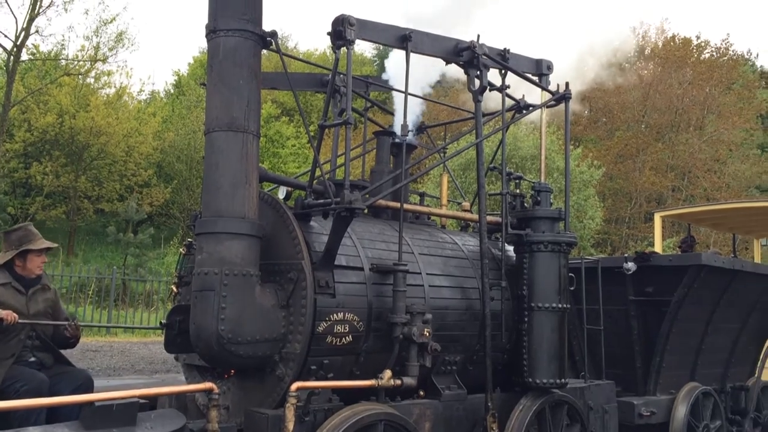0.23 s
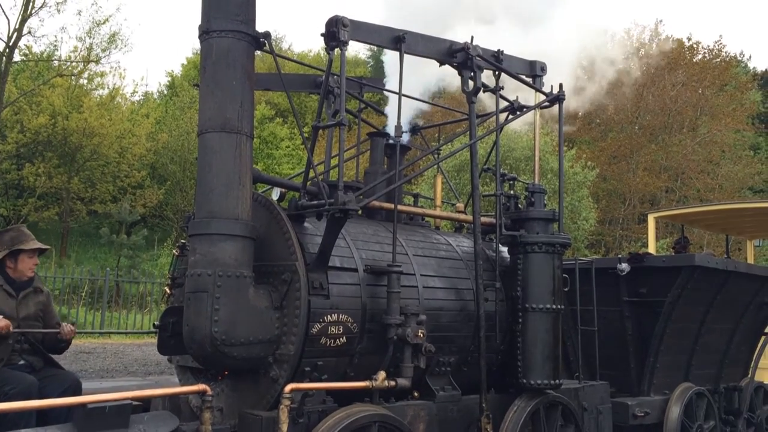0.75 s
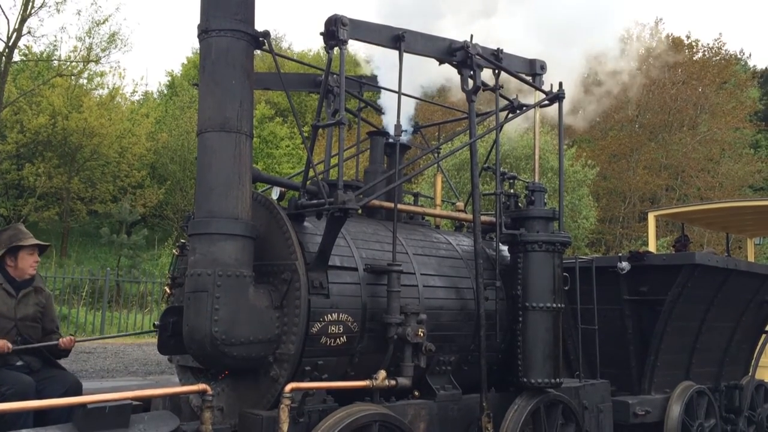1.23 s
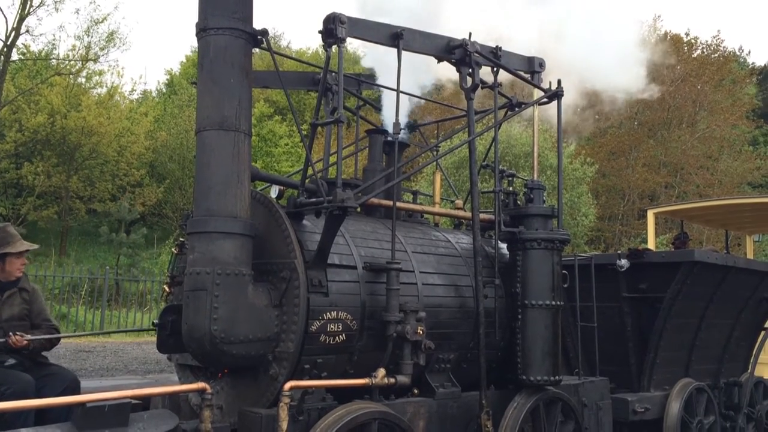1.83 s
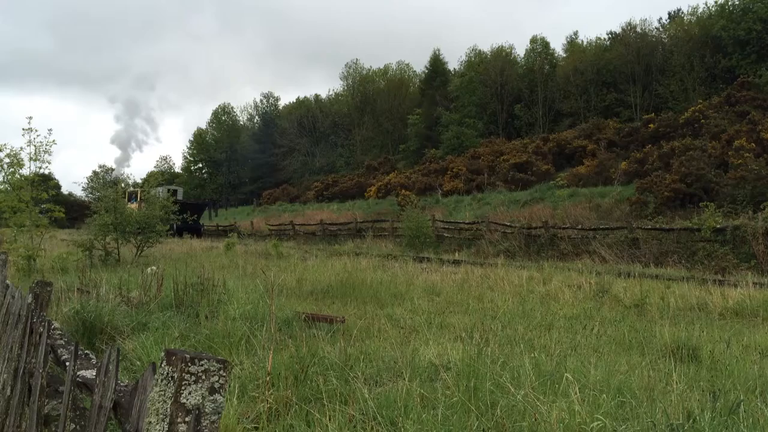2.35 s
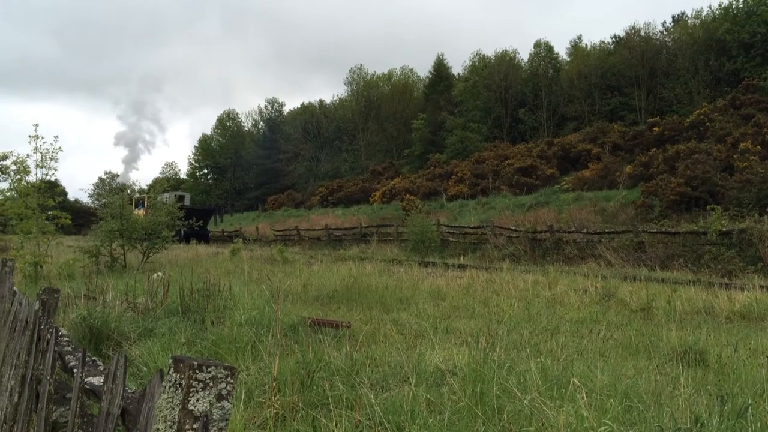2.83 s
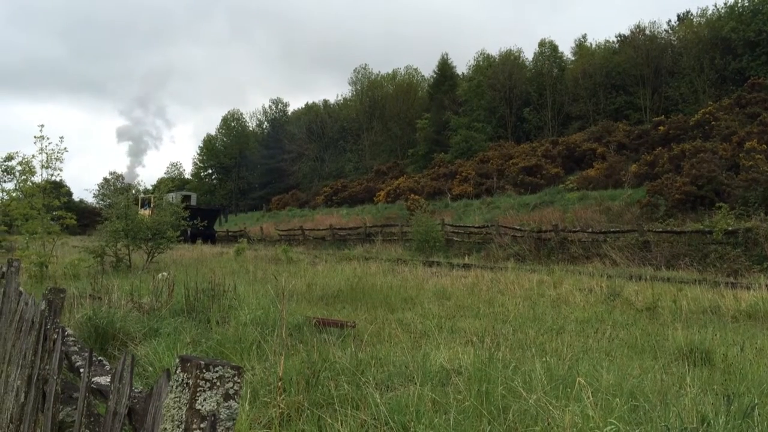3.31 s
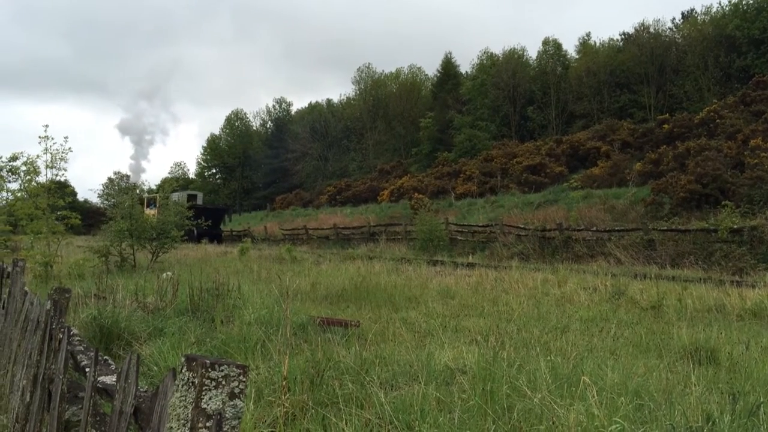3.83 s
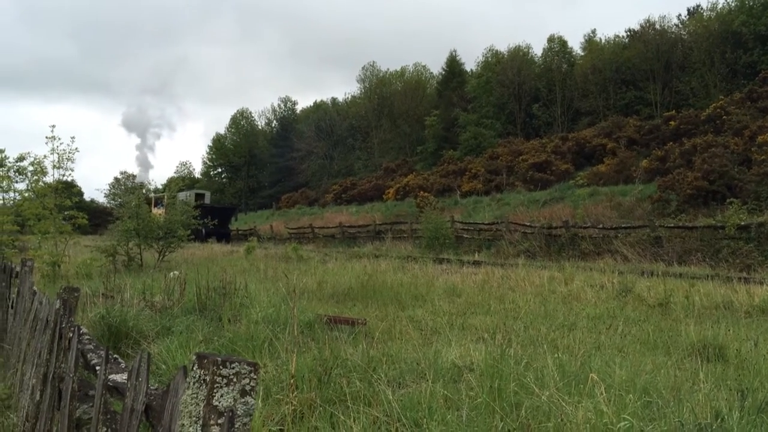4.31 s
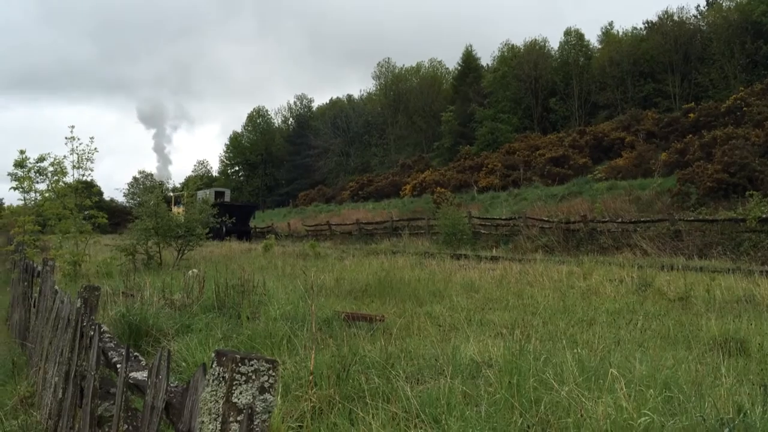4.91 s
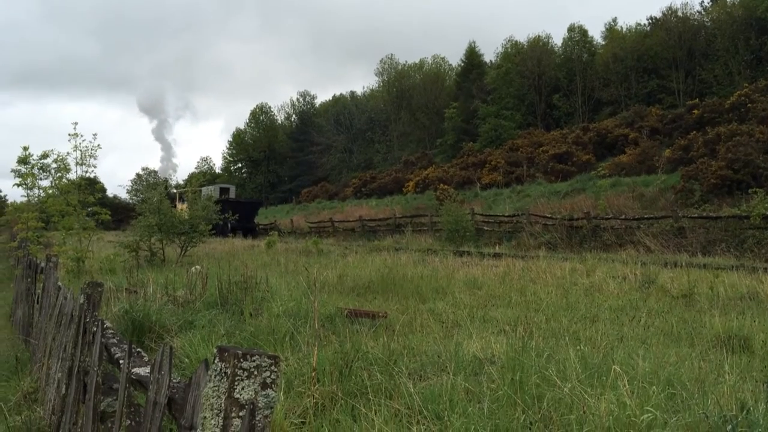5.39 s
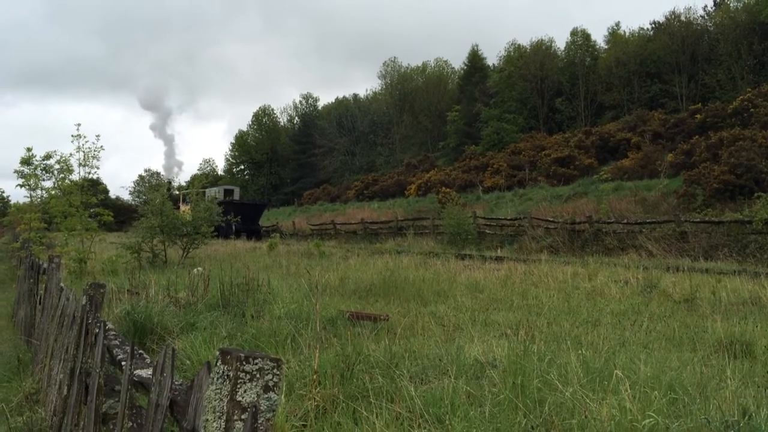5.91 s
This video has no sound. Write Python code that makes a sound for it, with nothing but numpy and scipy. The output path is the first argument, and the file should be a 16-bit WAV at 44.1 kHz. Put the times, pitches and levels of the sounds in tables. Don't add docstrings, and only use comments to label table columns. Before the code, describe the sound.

Loud close steam hisses and roars steadily with one metallic clank, then cuts through brief silence to a quiet meadow with birds and distant clanking.

```python
import sys
import numpy as np
from scipy import signal
from scipy.fft import rfft, irfft
from scipy.io import wavfile
from scipy.ndimage import uniform_filter1d

SR = 44100
rng = np.random.default_rng(int(sys.argv[2]) if len(sys.argv) > 2 else 0)


def invert_db(level):
    return 10 ** (np.asarray(level, dtype=float) / 20)


def master_out(mix):
    frames = np.transpose(np.atleast_2d(mix))
    ceiling = np.clip(frames, -1, 1)
    pcm = np.round(ceiling * 32767).astype(np.int16)
    wavfile.write(sys.argv[1], SR, pcm)


N = 271215

CUT_S, MEADOW_S = 2.4222, 2.5212

# time_s, level_db
JET_SWELL = [
    (0, -34.5),
    (1.2, -35.8),
    (2.1, -35),
    (2.4, -35.5),
]
# pitch_hz, level_db per Hz
JET_COLOUR = [(18, -67.5), (30, -41.5), (64, -8), (83, -13.5), (102, -24.5), (248, 2), (387, -7),
              (543, -8.5), (868, -4), (1040, -5), (2880, -12), (4490, -13.5), (15300, -13.5)]
# pitch_hz, width_hz, level_db (minus = a cancelled band)
JET_BANDS = [(270, 65, -4), (395, 35, -9), (546, 122, 8.5), (868, 51, -17), (1025, 140, 6), (1240, 68, 4),
             (1505, 32, 6), (1563, 72, -2.5), (1776, 44, 6), (1896, 73, -8.5), (1950, 120, 7),
             (2825, 820, -6), (4300, 320, 1)]
ROAR_DB, ROAR_FOLLOWS = -39.5, 0.45
# time_s, level_db
DRAUGHT = [
    (0, -79),
    (.3, -60.5),
    (.7, -64.5),
    (1.2, -60.5),
    (2.4, -69),
]
# time_s, rise_db, spread_s
GULPS = [
    (.76, 20.5, 0.059),
    (1.5, 8, 0.13),
]
UPPER_DB, LOW_FOLLOWS = -4, 0.37
# pitch_hz, level_db, t60_s
TOOL_MODES = [(242, -15, .4), (2013, -8, .2), (2805, -18, .3), (2450, -19, .08), (4400, -19, .08),
              (6250, -19, .08), (3015, -21, .2), (3300, -13, .05), (3542, -14, .2), (3736, -12, .15),
              (3994, -20, .15), (4775, -17, .2), (5044, -15, .09), (5330, -12, .05), (5626, -15, .18),
              (5911, -18, .12), (6800, -16, .05), (7370, -20, .12)]
# pitch_hz, level_db, t60_s
PLATE_MODES = [(460, -17, .08), (625, -8, .1), (780, -9, .1), (1050, -5, .08), (1205, -4, .07),
               (1270, -3, .07), (1540, -2, .05), (1707, -4, .045)]
# time_s, level_db
CONTACTS = [
    (1.5963, -30),
    (1.6015, -27),
    (1.6068, -23),
    (1.6112, -28),
]

# start_s, length_s, pitch_hz, level_db
HELD = [(2.52, 0.042, 1850, -71.5), (2.644, 0.058, 4980, -80), (3.52, 0.14, 2140, -72),
        (3.58, 0.019, 3080, -63), (3.6, .018, 3080, -62), (3.621, 0.034, 3010, -62.5),
        (3.075, 0.028, 2470, -68), (2.603, .032, 2400, -72), (3.679, .015, 3710, -68),
        (3.683, 0.014, 3210, -66), (3.701, .02, 3700, -70), (3.708, 0.032, 3080, -63.5),
        (3.717, .05, 2006, -73), (3.839, .045, 2790, -73), (5.04, 0.19, 7350, -85), (4.09, .1, 3050, -69),
        (4.05, .03, 4500, -78), (3.41, .012, 4900, -77), (5.58, .08, 2200, -81), (5.97, .08, 2620, -79),
        (4.315, .01, 5150, -64.5), (4.506, .025, 2250, -77), (4.561, 0.1, 2020, -75),
        (4.607, 0.022, 3220, -65), (4.847, .08, 7680, -84), (4.87, .11, 7200, -86),
        (5.163, 0.063, 2410, -80), (5.241, .03, 5500, -76), (5.31, .07, 1870, -79.5),
        (5.36, .015, 5800, -83), (5.67, 0.14, 2000, -79), (5.775, .008, 4700, -72),
        (5.788, .008, 4900, -72), (5.795, .02, 5250, -77), (5.838, 0.15, 2625, -69.5),
        (5.886, .022, 1520, -74), (5.92, .025, 1520, -71), (5.95, .03, 1500, -77), (5.882, .015, 2000, -73),
        (5.78, .015, 1950, -73)]
SAG = .012
# start_s, length_s, first_hz, last_hz, level_db
SLIDES = [(3.798, .015, 3200, 4200, -69.5), (3.812, .028, 4300, 2850, -67), (4.249, .008, 3600, 5500, -67),
          (4.257, .033, 4600, 3900, -68.5), (3.604, 0.034, 4850, 3730, -68), (4.313, .006, 5800, 5100, -70),
          (3.225, .035, 3640, 4300, -71), (3.31, .02, 4150, 3600, -69), (3.505, 0.0296, 1650, 1200, -74),
          (3.536, .014, 3300, 2300, -69), (3.14, 0.011, 2600, 1950, -68), (3.47, 0.035, 2610, 1660, -60),
          (3.586, .01, 3600, 5330, -65.5), (3.923, 0.014, 3400, 7900, -74), (3.94, .045, 1200, 1400, -74),
          (3.955, .026, 2780, 2550, -62.5), (3.981, .02, 2550, 2100, -73), (3.972, .013, 8000, 4600, -70),
          (4.007, .025, 1740, 1610, -72), (4.01, 0.03, 2930, 2600, -73), (4.138, 0.034, 3000, 3360, -66.5),
          (5.06, .015, 5400, 7200, -72), (5.043, .018, 3200, 4300, -75), (5.205, .013, 5800, 7000, -79),
          (5.218, .024, 7000, 5200, -74), (5.4, 0.11, 2200, 2150, -82), (5.8, .04, 2950, 3300, -79),
          (5.656, 0.049, 6250, 4400, -70.5)]
# start_s, length_s, foot_hz, top_hz, level_db
ARCHES = [
    (2.642, 0.061, 2580, 2934, -61),
    (2.83, .03, 3600, 3770, -84),
    (3.097, 0.049, 2500, 2980, -54.5),
    (3.285, .035, 3050, 3390, -72),
    (3.428, .03, 3600, 3950, -67),
    (3.262, .025, 4700, 5000, -78),
    (4.562, .035, 3930, 4450, -72),
    (5.31, .04, 5300, 6000, -75.5),
]
# start_s, length_s, first_hz, last_hz, level_db
HOOKS = [(2.57, 0.036, 2050, 2460, -71), (2.714, .068, 2200, 2450, -75), (2.6, 0.047, 5600, 5020, -77),
         (2.765, 0.022, 2090, 1880, -70), (2.785, .02, 4700, 5500, -82), (2.822, .135, 2410, 2150, -72),
         (3.068, .024, 5900, 4600, -74), (3.465, 0.024, 1600, 1210, -69.5), (2.803, .03, 8820, 6900, -80),
         (3.97, .06, 4100, 3350, -79), (4.074, .008, 5400, 5050, -64), (4.045, .13, 2180, 2330, -67),
         (4.235, .014, 4850, 4600, -72), (4.255, 0.032, 5450, 6120, -72), (4.355, 0.039, 3500, 6200, -74),
         (4.366, 0.032, 4700, 4250, -69.5), (4.53, 0.022, 3760, 4000, -67), (4.641, .045, 3250, 4500, -68),
         (4.825, 0.083, 6640, 3600, -68), (5.338, 0.015, 5470, 5420, -70), (5.385, .035, 7200, 6800, -79),
         (5.472, .015, 7000, 5000, -81), (5.56, .02, 5930, 5370, -75), (5.81, .03, 6900, 6070, -81),
         (5.92, 0.034, 6300, 5200, -70.5)]
HOOK_POWER = 2.6
# start_s, length_s, first_hz, last_hz, level_db
SCOOPS = [(2.985, .03, 4550, 3700, -75), (2.96, .06, 2150, 2350, -80), (5.945, .008, 5250, 4800, -76),
          (3.389, .025, 4600, 3650, -74), (3.437, .03, 5100, 4350, -73), (6.068, .045, 5500, 4500, -71.5),
          (4.17, .1, 2330, 1980, -74), (4.17, .12, 3100, 2600, -75), (4.2, .11, 2600, 2250, -75),
          (2.595, .03, 1780, 1600, -74), (3.03, .045, 2520, 2150, -70), (4.73, .06, 5000, 6800, -72),
          (4.975, .088, 5050, 5450, -66), (5.06, .062, 4400, 2700, -71.5), (4.7, .027, 5100, 3700, -78),
          (3.3, .03, 3150, 2600, -74), (3.655, .012, 2500, 2650, -72)]
SCOOP_POWER = 1.8
RAMP_S, THIN_DB = .005, 5
# start_s, length_s, middle_hz, width_hz, level_db
CHURRS = [(4.13, .18, 2250, 350, -70), (4.1, .22, 3050, 350, -70), (4.12, .18, 2650, 300, -72),
          (4.455, .085, 3000, 1400, -70), (4.345, .018, 5000, 1600, -71), (3.028, .04, 1740, 300, -72),
          (2.68, .12, 2000, 500, -76), (3.79, .05, 3500, 900, -74), (4.075, .035, 4700, 1200, -77),
          (4.33, .07, 5200, 1800, -76), (5.3, .3, 7200, 1600, -79), (5.79, .2, 6400, 2000, -80),
          (4.76, .07, 5250, 2000, -79), (4.85, .35, 3100, 1800, -77), (4.6, .2, 4300, 1500, -79),
          (5.05, .15, 4500, 2500, -79), (3.52, .04, 2100, 700, -69), (3.52, .06, 4400, 700, -75),
          (2.66, .13, 2650, 500, -73), (3.13, .1, 2500, 700, -71), (4.08, .18, 7720, 400, -84),
          (4.42, .26, 7680, 300, -83), (4.89, .09, 3680, 400, -77)]
CHURR_SAG_HZ = 91

# start_s, level_db, centre_hz, width_hz, length_s
TICKS = [(2.64, -75, 7930, 8900, .006), (3.099, -72, 7000, 9000, .008), (3.339, -62, 2500, 1600, .008),
         (3.341, -65, 8000, 9000, .0043), (3.516, -64, 11000, 6000, .004), (3.522, -67, 6000, 9000, .007),
         (3.528, -64, 5500, 9000, .02), (3.59, -76, 11000, 8000, .008), (4.076, -72, 7000, 9000, .008),
         (4.331, -72, 9000, 9000, .007), (4.885, -73, 3000, 2500, .012), (4.97, -72, 3300, 3500, .006),
         (5.178, -75, 4500, 2000, .006), (6.056, -60, 2400, 1500, .02), (6.057, -70, 9000, 9000, .008)]
# pitch_hz, level_db, t60_s
ROD_MODES = [(430, -5, .25), (595, 0, .16), (635, -5, .25), (740, -6, .1), (980, -1, .06), (1060, -3, .2),
             (1400, -12, .06), (1780, -13, .18), (1930, -8, .06), (2120, -3, .05), (2700, -7, .05),
             (2980, -8, .05)]
# start_s, level_db, brightness_db per octave
CLANKS = [(2.525, -63, -4), (2.58, -67, -2), (3.025, -66.5, 2), (3.944, -78, -13.5), (4.268, -68, 4),
          (4.281, -61, -4), (4.33, -68, -8), (4.422, -70, -10), (5.314, -85, 0), (5.797, -72, 3),
          (5.886, -67, 1), (5.985, -62.5, 2.5), (5.92, -75, 0), (6.056, -58.5, 5.5), (6.064, -60, 0),
          (6.088, -67.5, -12), (6.103, -65, 0), (6.123, -68, 3)]
# time_s, level_db
BUFFETS = [(2.53, -52), (3.0, -58.5), (3.03, -50.5), (3.46, -58.5), (3.9, -53.5), (4.44, -58), (4.47, -55),
           (5.5, -53), (5.63, -56), (5.66, -60.5), (5.91, -47.5), (5.97, -52), (6.04, -55), (6.11, -55),
           (6.15, -46)]
# pitch_hz, level_db per Hz
WIND_COLOUR = [(12, -29), (20, -7), (33, 8), (48, -2.5), (134, -3.5), (193, -6), (255, -42), (344, -28),
               (400, -28), (520, -54), (880, -120)]
# time_s, level_db
RUSH_SWELL = [
    (2.53, -66),
    (5.87, -66),
    (6.15, -60.5),
]
# pitch_hz, level_db per Hz
RUSH_COLOUR = [(120, -29), (200, -4), (272, -13.5), (470, -13.5), (617, -13.5), (856, -16), (1010, -15),
               (1420, -20), (3730, -22.5), (9090, -29.5), (14600, -31.5), (15400, -30.5)]
# time_s, low_hz, high_hz
SPLIT_BANDS = [(.15, 8300, 9650), (.15, 10350, 13800), (.195, 6200, 7600), (.195, 12400, 15300),
               (.29, 13100, 14500), (.45, 7600, 9000), (.45, 10350, 11700), (.545, 9000, 10350),
               (.71, 4150, 5200), (.755, 4150, 5700), (1.245, 4150, 5200), (1.245, 6200, 7600),
               (1.245, 11700, 13100), (1.385, 13100, 14500), (1.895, 4650, 7600), (2.08, 5200, 6200),
               (2.38, 5200, 6200), (5.4, 6200, 8300)]


def evened(x):
    return x / np.sqrt(np.mean(x ** 2) + 1e-20)


def read(points, hz):
    f, value = np.transpose(points)
    return np.interp(np.log(hz + 1), np.log(f + 1), value)


def curve(rows):
    rows = np.array(rows)
    return np.interp(np.arange(N) / SR, rows[:, 0], rows[:, 1])


def add(mix, start_s, sound):
    part = mix[round(start_s * SR):][:len(sound)]
    part += sound[:len(part)]


def hiss(colour_db, patchy_db, flicker_db, size):
    hz = np.fft.rfftfreq(size, 1 / SR)
    a, b, patches = rng.standard_normal((4 * N // size + 5, len(hz), 3)).T
    flicker = evened(uniform_filter1d(patches[0], size=3))
    patches = uniform_filter1d(patches, size=size // 80, axis=0)
    patches = evened(uniform_filter1d(patches, size=8000 // size + 4, axis=1))
    level_db = colour_db(hz)[:, None] + patchy_db * patches + flicker_db * flicker
    z = (a + 1j * b) * invert_db(level_db)
    return evened(signal.istft(z, nperseg=size, noverlap=3 * size // 4)[1][:N])


def hum(hz, width_hz):
    r = np.exp(-np.pi * width_hz / SR)
    slow = signal.lfilter([1], [1, -r], rng.standard_normal((N, 2)) @ [1, 1j])
    return evened((slow * np.exp(2j * np.pi * hz * np.arange(N) / SR)).real)


def ring(modes, tilt_db, crack_db, crack_s, crack_hz):
    t = np.arange(SR // 2) / SR
    tones = np.zeros(len(t))
    for hz, db, t60 in modes:
        level = invert_db(db + tilt_db * np.log2(hz / 1000) - 60 * t / t60)
        tones += level * np.sin(2 * np.pi * (hz * t + rng.random()))
    band = signal.butter(3, [400, crack_hz], "band", fs=SR, output="sos")
    grit = signal.sosfilt(band, rng.standard_normal(len(t)))
    return tones * np.minimum(t / 0.00074, 1) + invert_db(crack_db) * grit * np.exp(-t / crack_s)


def echoes(x, t60, first_s):
    t = np.arange(SR // 2) / SR
    signs = rng.choice([-1., 1.], len(t))
    sparse = rng.random(len(t)) < .06
    taps = signs * sparse * invert_db(-60 * t / t60) * (t > first_s)
    return signal.fftconvolve(x, taps / np.linalg.norm(taps))[:N]


def jet():
    def colour(hz):
        bands_db = sum(db / (1 + (2 * (hz - f) / width) ** 2) for f, width, db in JET_BANDS)
        return read(JET_COLOUR, hz) + bands_db
    whole = hiss(colour, patchy_db=0.66, flicker_db=0.24, size=2048)
    roar = signal.sosfiltfilt(signal.butter(3, 2600, fs=SR, output="sos"), whole)
    jet_db = curve(JET_SWELL)
    roar_db = ROAR_DB + ROAR_FOLLOWS * (jet_db - JET_SWELL[0][1])
    return invert_db(jet_db) * evened(whole - roar) + invert_db(roar_db) * evened(roar)


def firebox():
    t, draught_db = np.arange(N) / SR, curve(DRAUGHT)
    gulp_db = sum(rise_db * np.exp(-((t - s) / spread_s) ** 2) for s, rise_db, spread_s in GULPS)
    low = invert_db(draught_db + LOW_FOLLOWS * gulp_db) * hum(75, width_hz=5.2)
    upper = invert_db(draught_db + UPPER_DB + gulp_db) * hum(133, width_hz=25)
    return low + upper


def clank():
    out = np.zeros(N)
    tool = ring(TOOL_MODES, tilt_db=1.0, crack_db=0.5, crack_s=0.0066, crack_hz=7000)
    add(out, CONTACTS[0][0], invert_db(-21.0) * tool)
    for s, db in CONTACTS:
        plate = ring(PLATE_MODES, tilt_db=7.5, crack_db=10, crack_s=0.0062, crack_hz=2200)
        add(out, s, invert_db(db) * plate)
    return out + invert_db(-17) * echoes(out, t60=0.37, first_s=.004)


def whistles():
    out = np.zeros(N)
    shake = evened(uniform_filter1d(rng.standard_normal(N), size=150))
    held = [(s, length, hz * (1 + SAG), hz * (1 - SAG), db) for s, length, hz, db in HELD]
    kinds = [(held + list(SLIDES), lambda u: u),
             (ARCHES, lambda u: 4 * u * (1 - u)),
             (HOOKS, lambda u: 1 - (1 - u) ** HOOK_POWER),
             (SCOOPS, lambda u: u ** SCOOP_POWER)]
    for notes, bend in kinds:
        for start, length, from_hz, to_hz, db in notes:
            u = np.linspace(0, 1, round(length * SR))
            wobble = shake[round(start * SR):][:len(u)]
            pitch = (from_hz + (to_hz - from_hz) * bend(u)) * (1 + .006 * wobble)
            thinning_db = THIN_DB * np.log2(pitch / pitch.mean())
            level = invert_db(db + 3 + 1.7 * wobble[::-1] - thinning_db)
            shape = signal.windows.tukey(len(u), min(2 * RAMP_S / length, .6))
            add(out, start, shape * level * np.sin(2 * np.pi * np.cumsum(pitch) / SR))
    return out


def churrs():
    out = np.zeros(N)
    for start, length, hz, width, db in CHURRS:
        count = round(length * SR)
        rasp = evened(uniform_filter1d(rng.standard_normal(SR // 2), size=int(SR / width)))[:count]
        turns = np.cumsum(np.linspace(hz + CHURR_SAG_HZ, hz - CHURR_SAG_HZ, count)) / SR
        call = rasp * np.sin(2 * np.pi * turns) * signal.windows.tukey(count, .4)
        add(out, start, invert_db(db + 2.0) * call)
    return out


def birds():
    calls = whistles() + churrs()
    far_echo = invert_db(-7.5) * echoes(calls, t60=.85, first_s=.025)
    near_echo = invert_db(-10) * echoes(calls, t60=.2, first_s=.005)
    return calls + far_echo + near_echo


def grass():
    out = np.zeros(N)
    t, bins_hz = np.arange(2048) / SR, np.fft.rfftfreq(2048, 1 / SR)
    for s, db, hz, width, length in TICKS:
        band = np.exp(-.5 * ((bins_hz - hz) / (width / 2)) ** 2)
        grit = evened(irfft(rfft(rng.standard_normal(2048)) * band))
        add(out, s, invert_db(db) * grit * np.exp(-(t / length) ** 3))
    return out


def far_engine():
    out = np.zeros(N)
    for s, db, tilt_db in CLANKS:
        crack_hz = np.clip(1902 + 500 * tilt_db, 900, 5000)
        add(out, s, invert_db(db) * ring(ROD_MODES, tilt_db, crack_db=12, crack_s=0.01, crack_hz=crack_hz))
    return out + invert_db(-4) * echoes(out, t60=.28, first_s=.008)


def air():
    wind = hiss(lambda hz: read(WIND_COLOUR, hz), patchy_db=1.5, flicker_db=2.2, size=2048)
    rush = hiss(lambda hz: read(RUSH_COLOUR, hz), patchy_db=.7, flicker_db=.3, size=1024)
    bright = signal.sosfiltfilt(signal.butter(2, 2200, "high", fs=SR, output="sos"), rush)
    dull = invert_db(curve(RUSH_SWELL) + 2.0) * (rush - bright)
    return invert_db(curve(BUFFETS)) * wind + dull + invert_db(-70.5) * bright


def split_bands(x):
    out, window = x.copy(), np.sin(np.pi * np.arange(2048) / 2048)
    hz = np.fft.rfftfreq(2048, 1 / SR)
    for s, low_hz, high_hz in SPLIT_BANDS:
        at = 314 + 1024 * (round((s * SR - 314) / 1024) - 1)
        band = rfft(window * x[:, at:at + 2048]) * ((hz > low_hz) & (hz < high_hz))
        scrambled = band * np.exp(2j * np.pi * rng.random(band.shape))
        out[:, at:at + 2048] += window * irfft(np.sqrt(2) * scrambled - band)
    return out


def scene():
    t = np.arange(N) / SR
    engine = jet() + firebox() + clank()
    meadow = birds() + grass() + far_engine() + air()
    mono = (t < CUT_S) * engine + (t > MEADOW_S) * meadow
    return np.array([mono, mono])


def top_cut(x):
    return signal.sosfilt(signal.butter(12, 16520, fs=SR, output="sos"), x)


def record(dry):
    t = np.arange(N) / SR
    bass_cut = signal.sosfilt(signal.butter(4, 46, "high", fs=SR, output="sos"), dry)
    band_limit = signal.firwin(511, 15350, window=("kaiser", 9), fs=SR)
    limited = signal.oaconvolve(bass_cut, band_limit[None], "same")
    gapped = limited * ((t < CUT_S) | (t > MEADOW_S))
    return top_cut(split_bands(gapped))


dry = scene()
out = record(dry)
master_out(out)
```